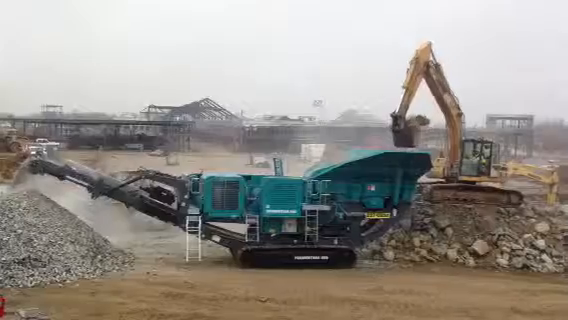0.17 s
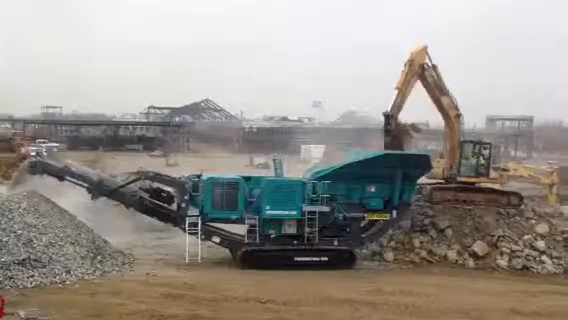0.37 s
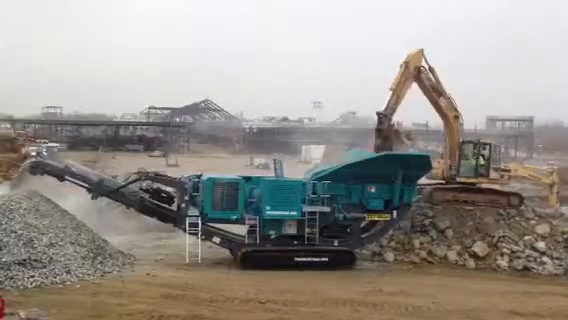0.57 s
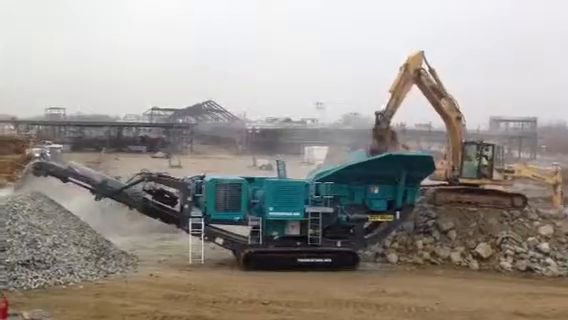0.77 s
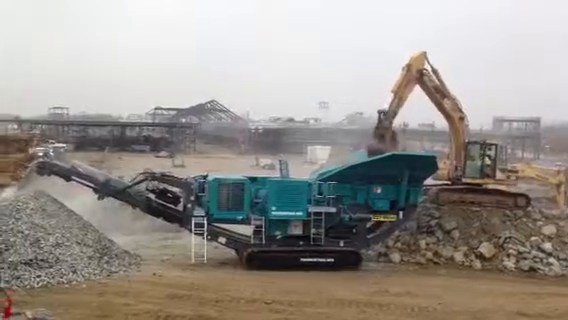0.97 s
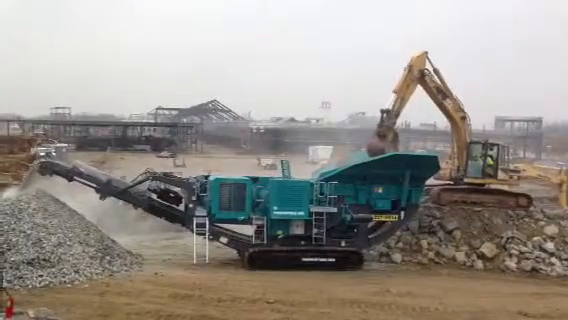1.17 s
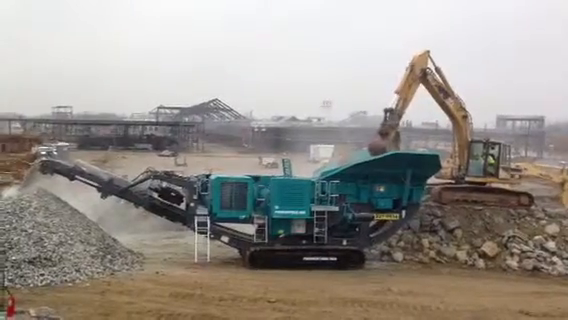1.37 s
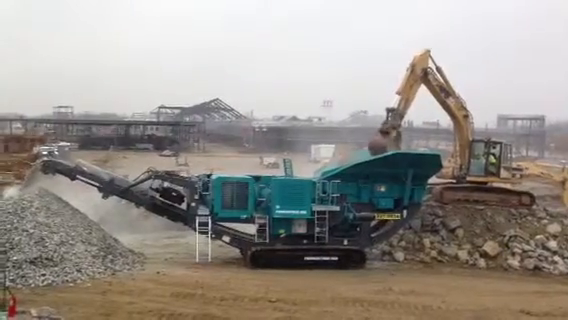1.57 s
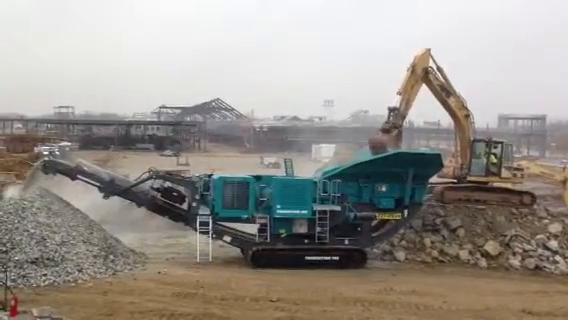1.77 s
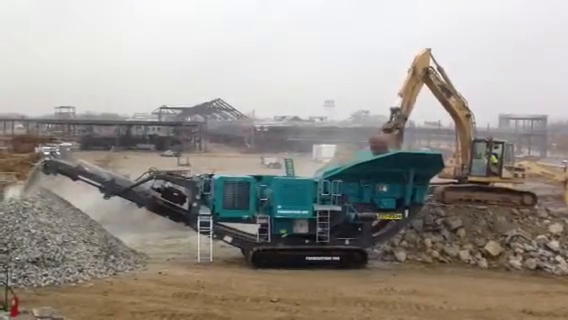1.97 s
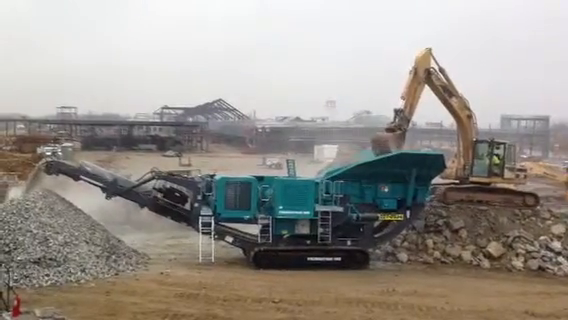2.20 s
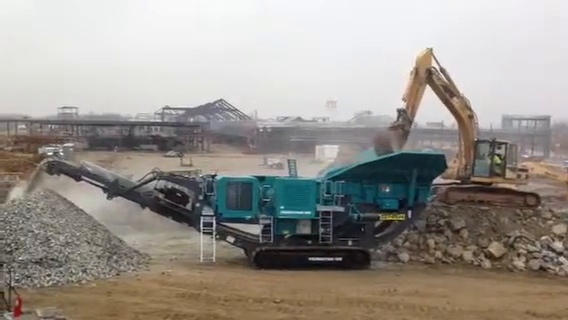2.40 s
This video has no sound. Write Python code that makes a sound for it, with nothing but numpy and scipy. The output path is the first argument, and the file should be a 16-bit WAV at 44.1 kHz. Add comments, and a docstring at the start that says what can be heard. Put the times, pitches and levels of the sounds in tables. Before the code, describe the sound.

Rocks crash and clang into a steel hopper while a mobile rock crusher rumbles in a quarry

```python
"""A mobile rock crusher roars in a quarry: a low rumble and a gravel hiss, both shaped from random noise.
Crashing stones are bursts of small random hits. Heavy rocks thud in the hopper, made of low resonances.
Short rising tones squeak now and then, and a steel plate clangs as a set of fading sine waves.
"""
import sys
import numpy as np
from scipy import signal
from scipy.fft import rfft, irfft, next_fast_len
from scipy.io import wavfile
from scipy.ndimage import uniform_filter1d, map_coordinates

SR = 44100
rng = np.random.default_rng(int(sys.argv[2]) if len(sys.argv) > 2 else 0)


def generate_wav(sig):
    """Save sig (samples, or channels by samples) to the path in sys.argv[1] as 16-bit PCM at SR."""
    pcm = np.round(np.clip(np.atleast_2d(sig).T, -1, 1) * 32767).astype(np.int16)
    wavfile.write(sys.argv[1], SR, pcm)


N = 112014  # length in samples

# How loud the roar is over time: t/s, low rumble level/dB, hiss level/dB
ROAR_LEVELS = [(0.36, -24.5, -30.5), (0.83, -26.5, -30.5), (1.02, -31, -25.5), (1.17, -23, -27.5),
               (1.25, -27, -28), (1.48, -34, -40), (1.57, -38.5, -35), (1.73, -31.5, -35.5),
               (1.83, -33, -38.5), (2.05, -30, -33), (2.2, -26, -32.5), (2.54, -26.5, -33.5)]
# Tone colour of the low rumble, relative: f/Hz, level/dB
RUMBLE_SPECTRUM = [(15, -63), (25, -19), (70, -25), (129, -7), (162, -4), (350, -3.5), (528, -9.5),
                   (796, -6.5), (994, -11), (1260, -24), (1500, -14), (1950, -17), (3300, -120)]
# Tone colour of the gravel hiss, relative: f/Hz, level/dB
HISS_SPECTRUM = [(530, -44.5), (900, -13), (1000, -8), (1270, -7.5), (1550, -9), (3510, -14), (4190, -14),
                 (14100, -39.5), (15200, -45)]

# Showers of stones: t/s, level/dB, rise/s, t60/s (time to fall 60 dB), treble tilt/dB per band.
# Each band scales the t60 by its own share.
STONE_CRASHES = [(0.12, -34, 0.0013, 0.36, -1.5), (0.798, -17.5, 0.0026, 0.45, 0.5),
                 (0.833, -2.5, 0.02, 0.16, 1.5), (0.88, -7.5, 0.0093, 0.26, 1), (.935, -24, .005, 0.13, 9),
                 (.993, -15.5, 0.0018, 0.061, -2), (1.03, -9.5, 0.0063, 0.13, 2),
                 (1.076, -11, 0.0053, 0.35, 1), (1.178, -15, 0.00203, 0.18, 0.5),
                 (1.206, -6.5, 0.017, 0.23, 0), (1.24, -29, 0.0055, 0.14, 0), (1.308, -15, 0.012, 0.23, 0),
                 (1.353, -6, 0.0095, 0.41, 0.5), (1.384, -12, 0.015, 0.58, 7.5),
                 (1.545, -8.5, .012, 0.38, 0.5), (1.59, -19, .01, 0.4, 17), (1.729, -18.5, 0.0085, .3, 0.5),
                 (1.99, -31, 0.034, 0.4, -4), (2.053, -19, 0.0075, 0.21, 1),
                 (2.089, -23.5, 0.0068, 0.21, 1.5), (2.144, -26, 0.0029, 0.12, 1),
                 (2.253, -29, 0.0074, 0.406, -5), (2.33, -39, 0.0088, 0.27, -5), (2.49, -52, .02, 0.39, -9)]
# Tone colour of the stones, relative: f/Hz, level/dB
STONE_SPECTRUM = [(88, -48.5), (150, -17), (325, -46), (478, -6), (806, -2), (2160, -2.5), (2770, -5.5),
                  (3430, 1.5), (5890, -13.5), (10900, -23.5), (15200, -47)]
STONES_PER_S, STONE_SPREAD_DB = 2200, 1.5
PELTING_DB = 29  # how hard loose stones drive the weak plate modes
PELTED_WIDENS = 2.1  # pelted modes are this many times wider, so they ring shorter than after a blow
TICK_DB, TICK_T60_S = -8, 0.02  # contact tick of each blow: level against the blow, time to fall 60 dB

# Rocks landing in the hopper: t/s, knock level/dB, deep push level/dB, rumble level/dB, rumble t60/s
ROCK_THUDS = [(0.308, -16, -36, -19.5, 0.34), (0.398, -34, -23, -41, 0.33), (0.577, -37, -35, -15.5, 0.067),
              (0.657, -34, -40, -26, 0.37), (0.728, -17.5, -33.5, -23.5, 0.36),
              (0.799, -18.5, -38, -25, 0.23), (0.891, -12, -38, -26.5, 0.6), (1.001, -20, -42, -22, 0.12),
              (1.08, -30, -41, -39, 0.24), (1.175, -11, -35, -21, 0.22), (1.38, -16, -43, -23.5, 0.47),
              (1.555, -16.5, -36, -28, 0.17), (1.584, -20, -38, -19, 0.35), (1.811, -20, -37, -27.5, 0.35),
              (2.001, -27, -32, -19.5, 0.11), (2.044, -14.5, -38, -16.5, 0.26),
              (2.074, -13.5, -39, -23, 0.2), (2.116, -14.5, -40, -15, 0.14), (2.275, -12, -17, -13.5, 0.3),
              (2.309, -21, -25, -24, 0.24), (2.417, -27, -21, -36, 0.29), (2.485, -12, -29, -19, 0.19),
              (2.523, -21, -26, -15, 0.23)]
# Resonances of the hopper: f/Hz, width/Hz, level/dB
HOPPER_RESONANCES = [(145.7, 38, 0), (196.4, 17, 7), (249, 27, 2.5), (299, 69, 1.5), (353.7, 30, 7.5),
                     (570, 58, -5), (828, 30, -2.5), (1000, 230, -15.5)]
PUSH_S, KNOCKS_PER_S = 0.0075, 540

# Squeaks: t/s, length/s, starting f/Hz, rise/Hz, level/dB
SQUEAK_TONES = [(.445, 0.031, 1000, 4.5, -25.5), (2.184, .035, 4692, 120, -36.5),
                (2.428, 0.023, 4790, 80, -40), (2.507, 0.03, 4900, 40, -33.5)]

# Blows on the plate: t/s, blow level/dB, rms levels of the four loudest modes/dB (four columns),
# time until stones damp the ring/s
PLATE_BLOWS = [(.8, -8, -20, -18.5, -20, -19.5, 0.043), (.8524, -9, -14, -19, -26, -30, 0.022),
               (.9921, -19, -27, -19, -34, -25, 0.052), (1.0324, -14, -26, -25, -23, -47, 0.044),
               (1.0779, -23, -25, -40, -25, -41.5, .015), (1.1786, -18, -41, -20, -37, -31, 0.03),
               (1.2126, -29, -24.5, -23, -22.5, -27.5, 0.027), (1.3567, -24, -34, -34, -24, -36, 0.039),
               (1.4114, -33, -36, -32, -30, -34.5, .13), (1.5433, -13, -36, -19, -35, -29.5, 0.12),
               (1.7279, -26, -45, -25, -38, -43, 0.012)]
# The four loudest ways the plate rings: f/Hz, t60/s
LOUD_PLATE_MODES = [(3415, 0.28), (3692, 0.48), (4405, 0.21), (5487, 0.69)]
# The weaker ways the plate rings: f/Hz, level against the blow/dB, t60/s
WEAK_PLATE_MODES = [(1547, -15.5, 0.051), (1920, -28, 0.14), (5260, -27, 0.23), (6600, -22, .3),
                    (7680, -23, 0.34), (8600, -42.5, 0.23), (9320, -31, 0.35), (9560, -42, 0.4),
                    (10700, -39, 0.42), (11600, -34, 0.155), (12190, -42, .2), (13700, -40, .2),
                    (14950, -39, .2)]
DAMPED_T60_S, DAMPED_BY_DB = 0.092, 13  # speed of the extra damping, and where it stops
MODE_SCATTER_DB, RATTLE_DB = 1, 2.5  # random level per weak mode; random level wobble in every ring

START_S = 0.119  # the sound begins
CEILING = 0.85  # soft limit for the peaks
TOP_HZ = 15350  # upper band limit


def amp(db):
    """Turn dB into a gain."""
    return 10 ** (np.asarray(db) / 20)


def unit(x):
    """Scale to an rms of 1."""
    return x / np.sqrt(np.mean(x ** 2) + 1e-20)


def along(points, hz):
    """Read a curve of (Hz, value) points along a log frequency axis."""
    f, values = np.transpose(points)
    return np.interp(np.log(hz + 1), np.log(f + 1), values)


def wobble(rate, size=N):
    """Random values, `rate` of them a second, joined by straight lines."""
    knots = rng.standard_normal(int(size * rate / SR) + 4)
    return map_coordinates(knots, [np.arange(size) * rate / SR], order=1)


def filtered(x, response):
    """Multiply the spectrum of x by a response, a function of frequency in Hz."""
    padded = next_fast_len(N + 8192)
    hz = np.fft.rfftfreq(padded, 1 / SR)
    return irfft(rfft(x, padded) * response(hz), padded)[..., :N]


def resonances(peaks):
    """Response of resonances (Hz, width Hz, dB) that ring only after being hit; signs alternate."""
    def response(f):
        total = 0
        for k, (centre, width, db) in enumerate(peaks):
            damping = 1j * f * width
            total = total + (-1) ** k * amp(db) * damping / (centre ** 2 - f ** 2 + damping)
        return total
    return response


def grains(per_s, spread_db, noise):
    """Random impacts of uneven size on a bed of noise, with an rms of 1."""
    hit = rng.random(N) < per_s / SR
    size = amp(spread_db * rng.standard_normal(N)) * np.sign(rng.standard_normal(N))
    return unit(unit(hit * size) + noise * rng.standard_normal(N))


def patchy(x, patchy_db):
    """Make the level vary in random patches of time and frequency."""
    spectrum = signal.stft(x, nperseg=512)[2]
    field = uniform_filter1d(rng.standard_normal(spectrum.shape), 5, 0)  # smooth over frequency
    field = uniform_filter1d(field, 8, 1)  # smooth over time
    return signal.istft(spectrum * amp(patchy_db * unit(field)), nperseg=512)[1][:N]


def burst(start, rise, t60):
    """Loudness curve of one impact: a soft rise, then an exponential fall."""
    t = np.maximum(np.arange(N) / SR - start, 0)
    return (1 - np.exp(-t / rise)) * amp(-60 * t / t60)


def roar():
    """Engine and frame rumble below, a hiss of small gravel above; their levels shake together."""
    times, low_db, high_db = np.transpose(ROAR_LEVELS)
    t = np.arange(N) / SR
    low = patchy(grains(900, 1.66, noise=1.74), patchy_db=1.0)
    low = unit(filtered(low, lambda hz: amp(along(RUMBLE_SPECTRUM, hz))))
    high = patchy(grains(3500, 4.1, noise=1.284), patchy_db=1.5)
    high = unit(filtered(high, lambda hz: amp(along(HISS_SPECTRUM, hz))))

    shake_db = 1.5 * wobble(13.93)
    low_gain = amp(np.interp(t, times, low_db) + shake_db + 1.064 * wobble(30.29))
    high_gain = amp(np.interp(t, times, high_db) + 1.3 * shake_db)
    return low * low_gain + high * high_gain


def crashes():
    """Showers of stones: the treble of each dies sooner than its body, and the plate rings along."""
    stones = patchy(grains(STONES_PER_S, STONE_SPREAD_DB, noise=2.0), patchy_db=3.0)
    stones = unit(filtered(stones, lambda hz: amp(along(STONE_SPECTRUM, hz))))

    edges = [0, 1200, 3000, 6000, SR]  # band limits in Hz
    out = np.zeros(N)
    for k, t60_share in enumerate([1.17, 0.9, 0.72, 0.44]):
        band = filtered(stones, lambda hz: (hz >= edges[k]) & (hz < edges[k + 1]))
        power = np.zeros(N)
        for start, db, rise, t60, tilt in STONE_CRASHES:
            power += (amp(db + tilt * (k - 2.5)) * burst(start, rise, t60 * t60_share)) ** 2
        envelope = np.sqrt(power)
        out += band * envelope
    treble_envelope = envelope  # the last band is the highest

    tick_power = np.zeros(N)
    for start, blow_db, *_ in PLATE_BLOWS:
        tick_power += (amp(blow_db + TICK_DB) * burst(start, 0.00037, TICK_T60_S)) ** 2
    ticks = np.sqrt(tick_power) * stones

    # a resonance that fades faster is wider
    plate = [(hz, PELTED_WIDENS * np.log(1000) / (np.pi * t60), db) for hz, db, t60 in WEAK_PLATE_MODES]
    pelting = amp(PELTING_DB) * treble_envelope * grains(150, 6.3, noise=0.37)
    return out + ticks + filtered(pelting, resonances(plate))


def thuds():
    """A heavy rock knocks the hopper's low resonances, pushes the frame once and tumbles on."""
    hopper = resonances(HOPPER_RESONANCES)
    power, blows, pushes = np.zeros(N), np.zeros(N), np.zeros(N)
    for start, knock_db, push_db, rumble_db, t60 in ROCK_THUDS:
        power += (amp(rumble_db) * burst(start, 0.0037, t60)) ** 2
        blows[round(start * SR)] = amp(knock_db)
        pushes[round(start * SR)] = amp(push_db)

    tumble = grains(KNOCKS_PER_S, 0.67, noise=0.81)
    rumble = filtered(tumble * np.sqrt(power), hopper) / np.std(filtered(tumble, hopper))
    single_hit = (np.arange(N) == 0) * 1.0
    knock = filtered(blows, hopper) / np.abs(filtered(single_hit, hopper)).max()  # one knock peaks at its level
    push = signal.fftconvolve(pushes, np.hanning(round(PUSH_S * SR)))[:N]
    return rumble + knock + push


def squeaks():
    """Short thin tones that rise a little in pitch and swell and fade like half a sine wave."""
    out = np.zeros(N + SR)
    for start, length, hz, rise_hz, db in SQUEAK_TONES:
        u = np.linspace(0, 1, round(length * SR))
        tone = np.sin(2 * np.pi * np.cumsum(hz + rise_hz * u) / SR)
        out[round(start * SR):][:len(u)] += amp(db) * np.sqrt(2) * np.sin(np.pi * u) * tone
    return out[:N]


def clangs():
    """Each blow rings the plate in many modes; stones rattle on it and soon damp it."""
    out = np.zeros(N + SR)
    t = np.arange(SR // 2) / SR
    for start, blow_db, *loud_db, lasts in PLATE_BLOWS:
        # rms to sine peak adds 3 dB
        modes = [(hz, db + 10 * np.log10(2), t60) for (hz, t60), db in zip(LOUD_PLATE_MODES, loud_db)]
        for hz, db, t60 in WEAK_PLATE_MODES:
            modes.append((hz, blow_db + db + MODE_SCATTER_DB * rng.standard_normal(), t60))

        ring = np.zeros(len(t))
        for hz, db, t60 in modes:
            level = amp(db - 60 * t / t60 + RATTLE_DB * wobble(61, len(t)))
            ring += level * np.sin(2 * np.pi * hz * t + 0.72 * wobble(79, len(t)))
        damp_db = np.minimum(60 * np.maximum(t - lasts, 0) / DAMPED_T60_S, DAMPED_BY_DB)
        attack = 1 - np.exp(-t / 0.001)
        out[round(start * SR):][:len(t)] += ring * amp(-damp_db) * attack
    return out[:N]


def scene():
    """Add all sources into one channel."""
    return (roar() + crashes() + thuds() + squeaks() + clangs())[None]


def record(dry):
    """The microphone thins the deep bass; the sound cuts in, peaks clip softly, the top is cut off."""
    def bass_cut(hz):
        s = 1j * hz / 90  # corner at 90 Hz
        return s ** 2 / (s ** 2 + 1.4 * s + 1)

    thin = filtered(dry, bass_cut)
    opened = thin * np.clip((np.arange(N) / SR - START_S) / 0.0013, 0, 1)
    clipped = opened / (1 + np.abs(opened / CEILING) ** 4) ** (1 / 4)
    return filtered(clipped, lambda hz: 1 / (1 + (hz / TOP_HZ) ** 400))


dry = scene()
out = record(dry)
generate_wav(out)
```